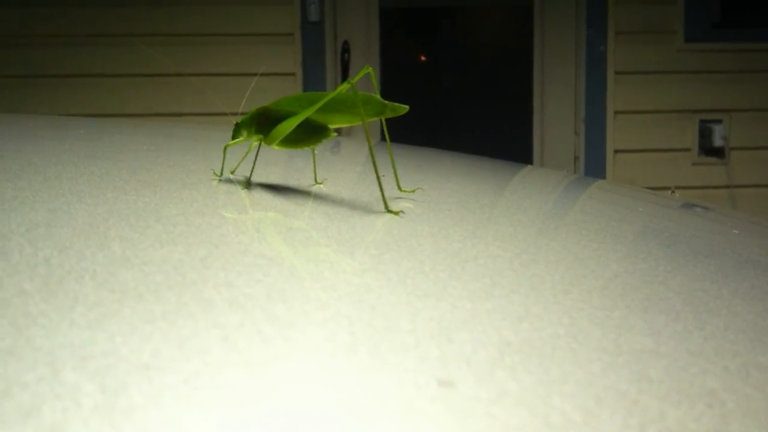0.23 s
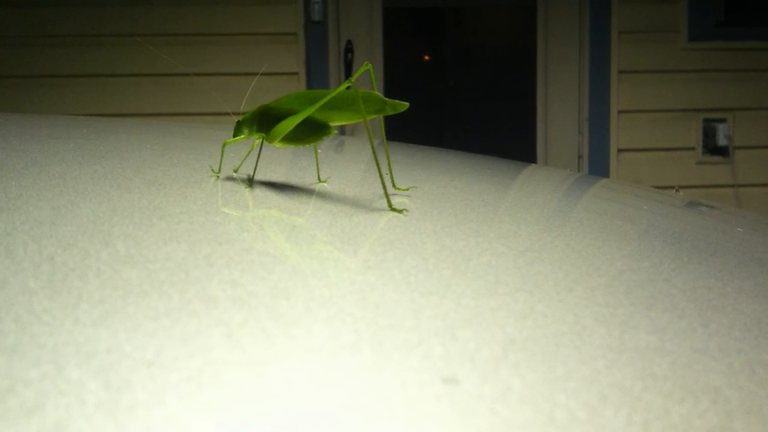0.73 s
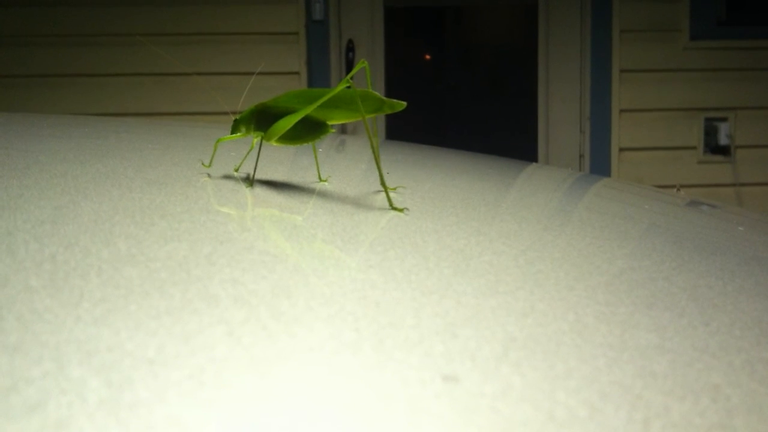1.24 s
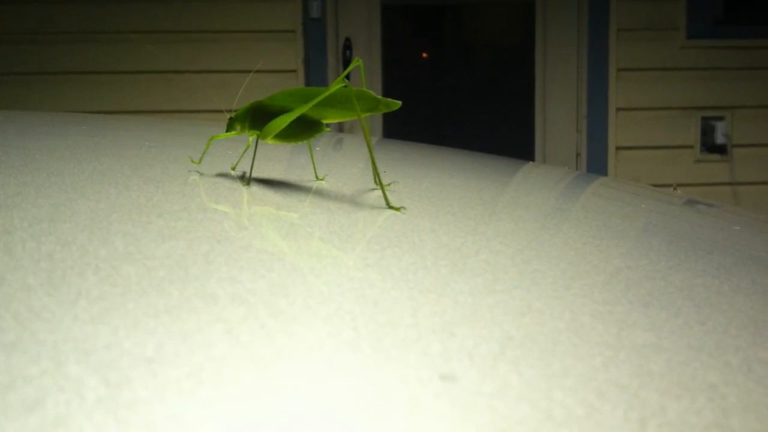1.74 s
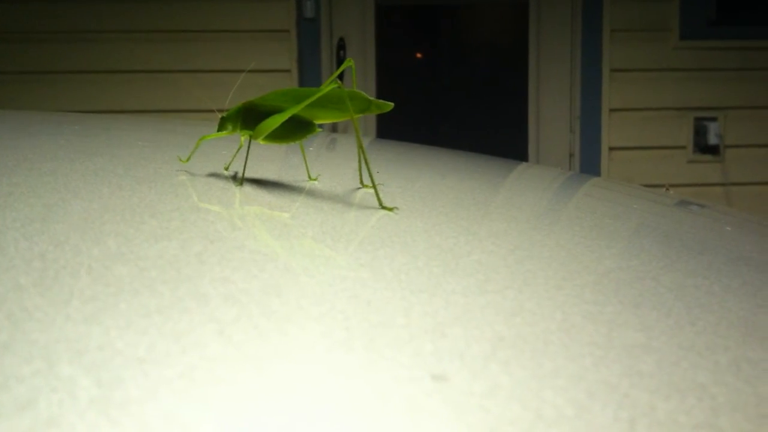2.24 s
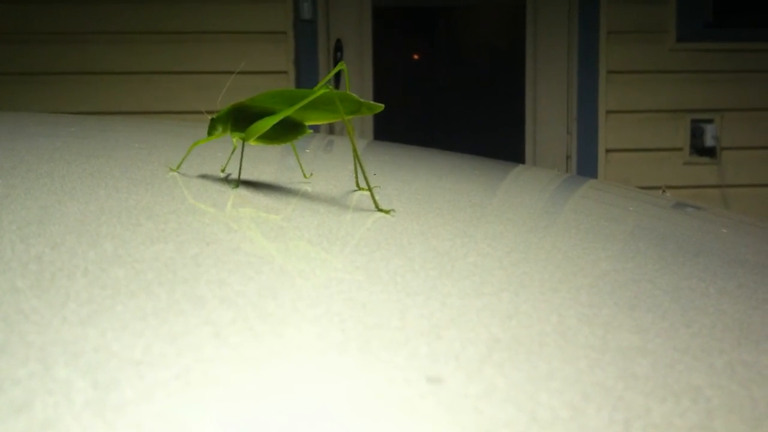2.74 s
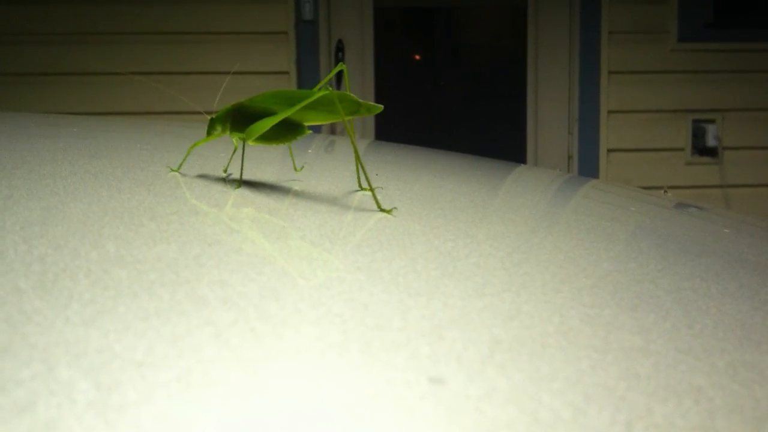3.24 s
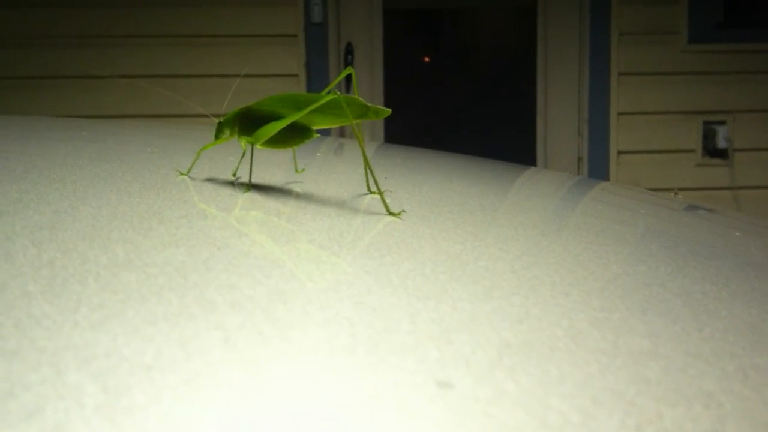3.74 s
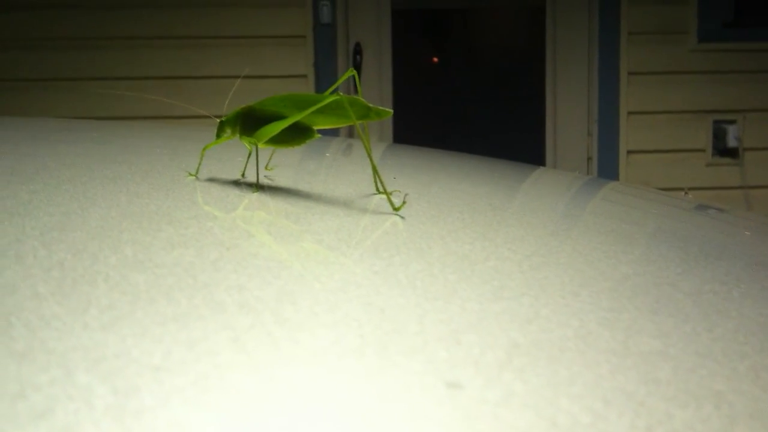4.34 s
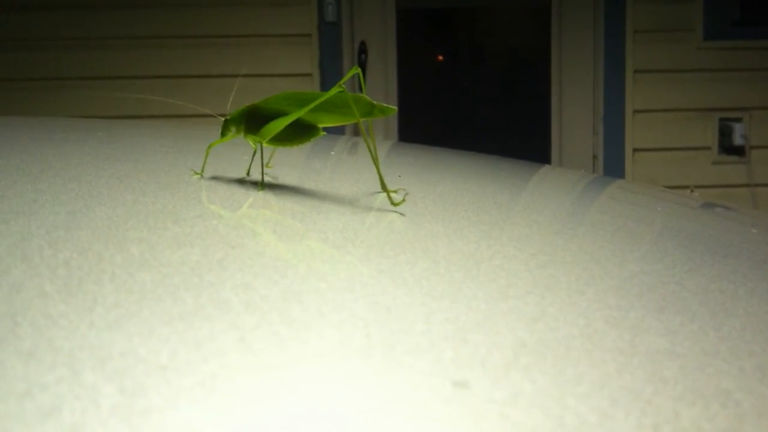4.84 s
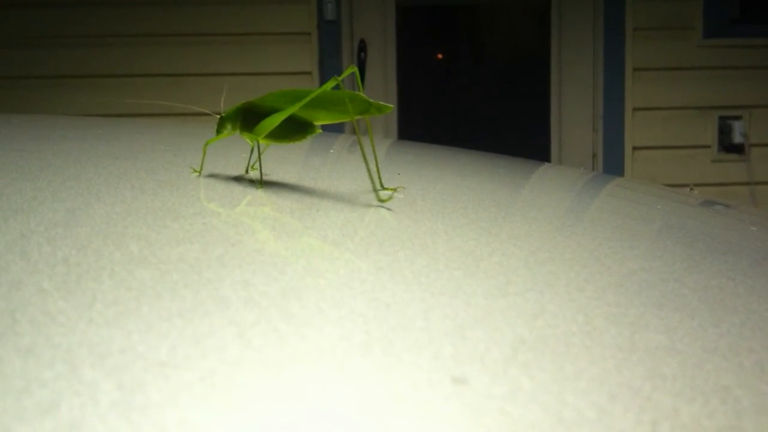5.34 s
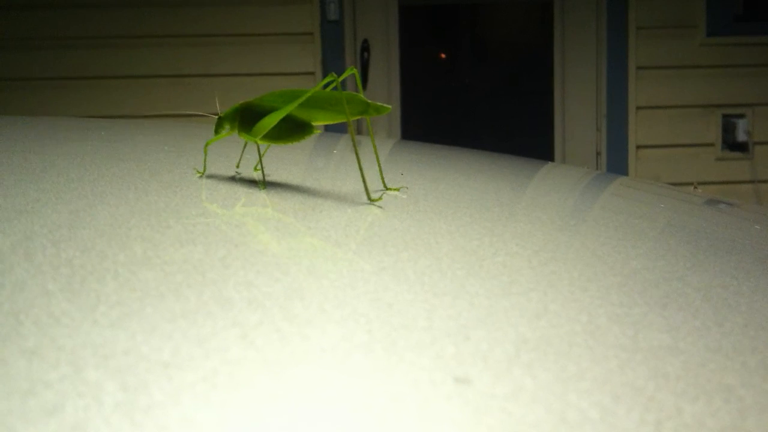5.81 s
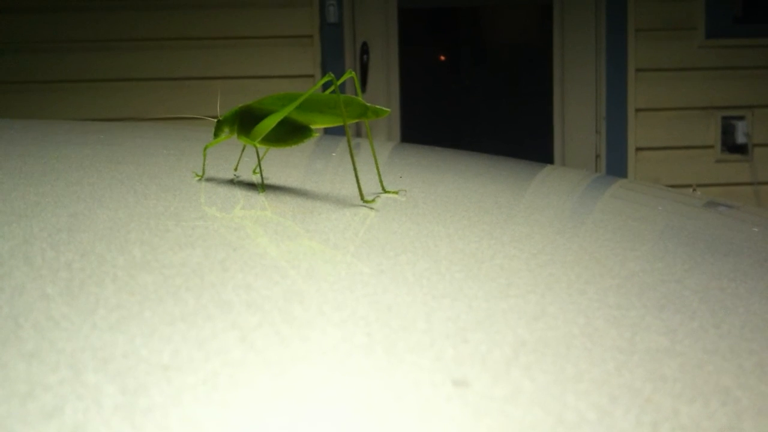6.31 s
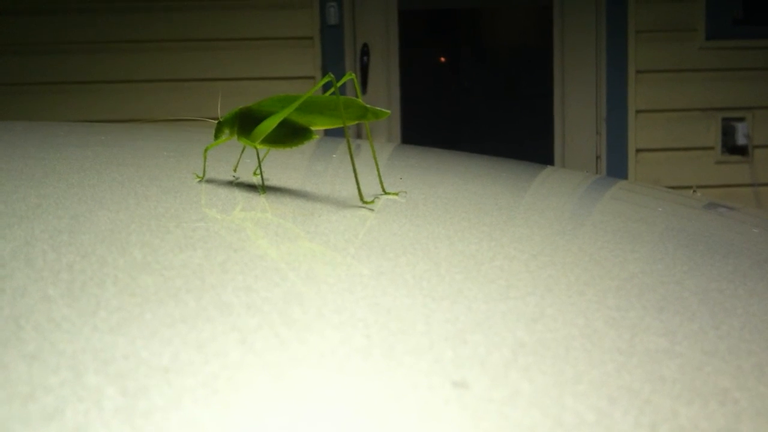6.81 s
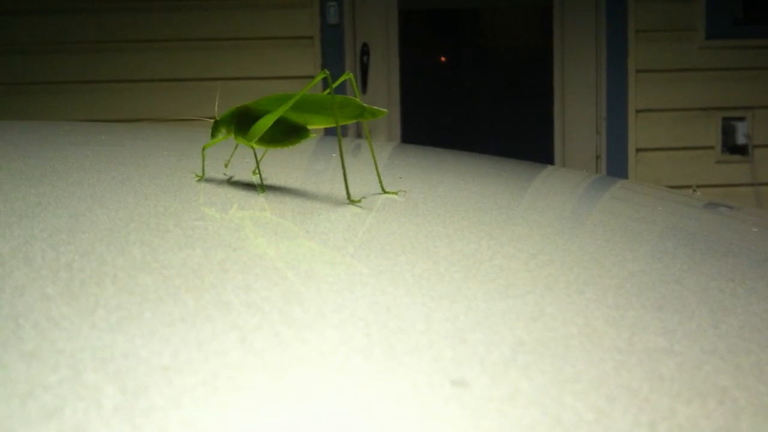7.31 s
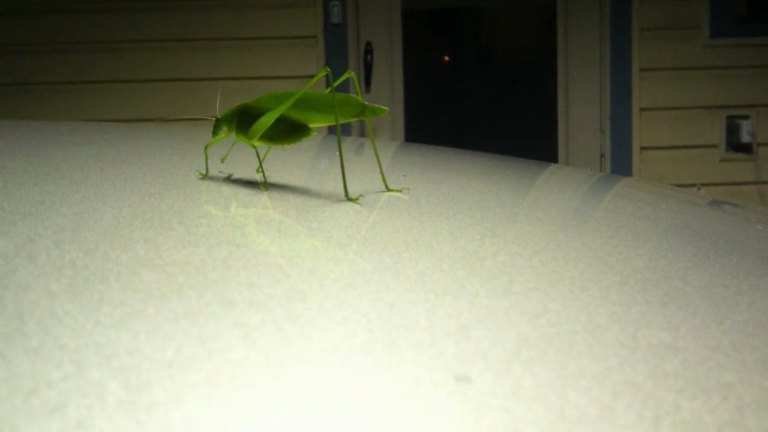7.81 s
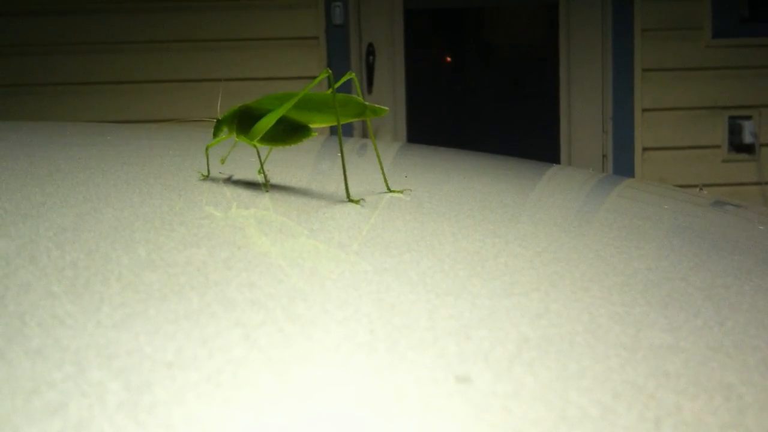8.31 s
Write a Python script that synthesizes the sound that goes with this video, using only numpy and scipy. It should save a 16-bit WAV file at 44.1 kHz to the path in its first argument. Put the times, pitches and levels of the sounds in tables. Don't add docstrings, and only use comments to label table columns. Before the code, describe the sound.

A continuous high cricket band shimmers over low night air while katydids overlap in raspy, pulsing phrases about a second apart, some close and dry, some lower and almost whistled, many farther away. Short gaps leave mainly the trill. A cricket zips now and then, swelling and stopping, and sparse tiny clicks sound close to the microphone. Distant traffic swells barely near five seconds. Mono, open yard with slight short echoes from walls and trees.

```python
import sys
import numpy as np
from scipy import signal
from scipy.fft import rfft, irfft, next_fast_len
from scipy.io import wavfile
from scipy.ndimage import uniform_filter1d

SR = 44100
rng = np.random.default_rng(int(sys.argv[2]) if len(sys.argv) > 2 else 0)


def digitize_waveform(pressure):
    field = np.atleast_2d(pressure).T
    bounded = np.clip(field, -1, 1)
    quanta = np.round(bounded * 32767).astype(np.int16)
    wavfile.write(sys.argv[1], SR, quanta)


def ratio_of_db(decibels):
    return 10 ** (np.asarray(decibels, float) / 20)


N = 377496

# first_stroke_s, last_stroke_s, level_db
NEAR_PHRASES = [
    (0.051, 0.051, -51.5),
    (1.119, 1.305, -53),
    (2.212, 2.401, -53),
    (3.27, 3.468, -53),
    (4.335, 4.59, -54.5),
    (5.483, 5.761, -52.5),
    (7.165, 7.447, -52),
]
# first_stroke_s, last_stroke_s, level_db
NEIGHBOUR_PHRASES = [(0.266, 0.266, -55.5), (0.43, 0.43, -55), (1.422, 1.497, -58), (2.147, 2.147, -60),
                     (2.578, 2.578, -58), (5.349, 5.349, -56), (6.421, 6.421, -62), (6.594, 6.594, -58),
                     (7.105, 7.105, -60)]
# first_stroke_s, last_stroke_s, first_level_db, last_level_db, pitch_hz
LOW_PHRASES = [(0.16, 0.16, -65, -65, 2040), (0.247, 0.419, -55.5, -55, 2100),
               (1.13, 1.307, -64, -60, 2010), (1.409, 1.494, -56, -55.5, 2164),
               (1.673, 1.673, -63, -75, 2050), (2.0, 2.0, -64.5, -64, 2010), (2.334, 2.334, -61, -61, 2090),
               (2.451, 2.54, -52.5, -61, 2160), (2.954, 3.129, -61, -61.5, 2070),
               (3.21, 3.405, -61, -56, 2133), (4.047, 4.2, -64, -59.5, 2044), (4.273, 4.47, -58, -58, 2140),
               (5.33, 5.522, -57.5, -56, 2110), (5.646, 5.646, -66, -64, 1980),
               (6.381, 6.381, -65, -62, 2180), (6.483, 6.665, -56, -58.5, 2165),
               (6.756, 6.833, -66, -63, 2050), (7.187, 7.379, -56.5, -57, 2110),
               (8.267, 8.511, -62, -62, 2070)]
# start_s, end_s, level_db, body_mode_level_db
CROWD_PHRASES = [(0.15, 0.25, -59.5, 1), (0.27, 0.5, -55, -1), (0.72, 1.0, -62.5, 1.5),
                 (1.05, 1.25, -63, 0), (1.28, 1.55, -56, -0.5), (1.6, 1.7, -60.5, -0.5),
                 (1.8, 2.1, -63.5, 0), (2.3, 2.63, -55.5, -0.5), (2.93, 3.17, -59.5, -1.5),
                 (3.2, 3.46, -55.5, 1), (3.95, 4.22, -59, -1), (4.26, 4.55, -55, 0), (4.58, 4.72, -61, 2),
                 (4.78, 4.92, -62.5, 2.5), (5.2, 5.33, -60.5, 1), (5.36, 5.6, -54.5, -0.5),
                 (5.64, 5.88, -59.5, -1.5), (6.37, 6.62, -56, 0), (6.65, 6.88, -61, -0.5),
                 (7.18, 7.47, -57, -0.5), (7.58, 7.82, -62, 0), (7.9, 8.2, -64.5, -0.5),
                 (8.25, 8.52, -59.5, 0.5)]
# centre_hz, width_hz, level_db
UPPER_MODES = [(3830, 470, -13), (4315, 1290, 12.5), (4870, 1550, 9)]
BODY_MODES = [(2050, 310, 0), (2680, 780, 1), (2946, 590, 4), (3260, 160, -6)]
BRIGHT_MODES = [(7900, 4200, -5), (11600, 2700, 9), (13000, 1700, 4), (14600, 2300, 3)]
# farthest_murmur_db, phrase_gain_db
CROWD_BALANCE = [
    (-64.5, 0),
    (-62, -1.5),
    (-88, -29.5),
]
# start_s, end_s, full_level_db
ZIPS = [
    (1.97, 2.14, -69),
    (2.716, 2.85, -73),
    (3.143, 3.51, -57.5),
    (5.764, 5.89, -69),
    (6.74, 7.04, -57.5),
]
# time_s, level_db (the peak lies 9 dB higher)
TICK_TIMES = [(0.3146, -54), (0.6794, -73), (0.7694, -73), (0.9522, -69), (2.8274, -76), (3.0334, -73),
              (3.5494, -74), (3.6184, -71), (4.1134, -73), (6.0417, -74), (6.0985, -69), (7.5864, -74),
              (7.9494, -72)]
# frequency_hz, density_db_per_hz
AIR_SPECTRUM = [(30, -29), (60, -24.5), (105, -16.5), (150, 1.5), (230, -0.5), (500, -9.5), (1100, -16.5),
                (1700, -15.5), (3600, -20), (5600, -16.5), (7200, -27.5), (9000, -28), (10500, -51),
                (15500, -61)]
# time_s, level_db
TRAFFIC = [(0, -62.5), (2, -62.5), (4.2, -62.5), (4.7, -62), (5.1, -58.5), (5.5, -63), (7, -62),
           (8.56, -62)]
# centre_hz, width_hz, level_db
MOTOR_LINES = [(119.6, 4, -6), (239, 6, -2), (481, 20, -5), (649, 12, -19)]

STROKE_GAP_S = .09
STROKE_PEAK_S = .07


def near_katydid(phrases, wing_hz, upper_db):
    out, shape = np.zeros(N), stroke(.034, .021, 5000)
    sag = np.linspace(1.05, .97, len(shape))
    for first, last, level_db in phrases:
        for s, db, hz in phrase(first, last, level_db, level_db, wing_hz):
            clicks = teeth(len(shape), 1500, .4)
            lower = evened(resonate(clicks, hz * sag, 480))
            upper = evened(resonate(clicks, 1.41 * hz * sag, 600))
            add(out, s - STROKE_PEAK_S, ratio_of_db(db) * shape * (lower + ratio_of_db(upper_db) * upper))
    return out


def low_katydids():
    out, shape = np.zeros(N), stroke(.034, .018, 5000)
    for row in LOW_PHRASES:
        for s, db, hz in phrase(*row):
            clicks = teeth(len(shape), 1200, .3)
            whistle = evened(resonate(clicks, hz, 130))
            octave = evened(resonate(clicks, 2.05 * hz, 250))
            add(out, s - STROKE_PEAK_S, ratio_of_db(db) * shape * (whistle + ratio_of_db(-10) * octave))
    return out


def phrase(first, last, first_db, last_db, hz):
    count = round((last - first) / STROKE_GAP_S) + 1
    level_scatter, pitch_scatter = rng.standard_normal((count, 2)).T
    times = np.linspace(first, last, count)
    levels_db = np.linspace(first_db, last_db, count) + .7 * level_scatter
    return zip(times, levels_db, hz * (1 + .012 * pitch_scatter))


def stroke(rise_s, fall_s, size):
    t = np.arange(size) / SR - STROKE_PEAK_S
    return np.where(t < 0, np.exp(-(t / rise_s) ** 2), np.exp(-(t / fall_s) ** 2))


def teeth(n, per_s, uneven):
    jitter = uneven * rng.standard_normal(n) * np.sqrt(SR / per_s)
    turns = np.cumsum(per_s * (1 + jitter)) / SR
    strength = rng.choice([-1., 1.], n) * rng.uniform(.54, 1, n)
    crossings = np.diff(np.floor(np.maximum.accumulate(turns)), prepend=0).clip(0, 1)
    return crossings * strength


def resonate(x, hz, width, order=2):
    carrier = np.exp(2j * np.pi * np.cumsum(hz * np.ones(len(x))) / SR)
    decay = np.exp(-np.pi * width / SR)
    z = x / carrier
    for _ in range(order):
        z = signal.lfilter([1 - decay], [1, -decay], z)
    return 2 * (carrier * z).real


def evened(x):
    return x / np.sqrt(np.mean(x ** 2) + 1e-20)


def add(mix, s, sound):
    at = round(s * SR)
    part = mix[max(at, 0):at + len(sound)]
    part += sound[max(-at, 0):][:len(part)]


def yard(x, t60):
    at = np.arange(200, SR // 2, 20)
    taps = np.zeros(SR // 2 + 20)
    decay = ratio_of_db(-60 * at / SR / t60)
    taps[at + rng.integers(0, 20, len(at))] = rng.choice([-1., 1.], len(at)) * decay
    return signal.fftconvolve(x, taps / np.linalg.norm(taps))[:N]


def crowd():
    clicks, out = teeth(N, 2500, .5), np.zeros(N)
    for (murmur_db, gain_db), modes in zip(CROWD_BALANCE, (UPPER_MODES, BODY_MODES, BRIGHT_MODES)):
        total = sum(ratio_of_db(2 * db) for _, _, db in modes)
        for mode in modes:
            t, phrase_power = crowd_power(CROWD_PHRASES, modes is BODY_MODES)
            patchy_db = evened(uniform_filter1d(rng.standard_normal(len(t)), size=12))
            power = ratio_of_db(2 * murmur_db) + ratio_of_db(2 * gain_db) * phrase_power
            level = np.sqrt(power / total) * ratio_of_db(mode[2] + patchy_db)
            ring = wing(np.roll(clicks, rng.integers(N)), [mode])
            out += np.interp(np.arange(N) / SR, t, level) * ring
    return out


def crowd_power(rows, body):
    t = np.arange(N // 220 + 2) * 220 / SR
    power = np.zeros(len(t))
    for start, end, db, body_db in rows:
        early, late, phase = rng.standard_normal(3)
        start, end = start + .015 * early, end + .015 * late
        progress = np.clip((t - start) / max(end - start, .02), 0, 1)
        arch_db = 1.5 * (np.sin(np.pi * progress) - .5)
        pulse_db = 2.5 * np.cos(2 * np.pi * ((t - end) / STROKE_GAP_S + phase))
        echo_db = -147 * np.maximum(t - end, 0)
        rise = np.exp(-2 * (np.maximum(start - t, 0) / .032) ** 2)
        power += ratio_of_db(2 * (db + body * body_db + arch_db + pulse_db + echo_db)) * rise
    return t, power


def wing(x, modes):
    size = next_fast_len(len(x))
    f = np.fft.rfftfreq(size, 1 / SR)
    power = sum(ratio_of_db(2 * db) / width / (1 + (2 * (f - hz) / width) ** 2) ** 2 for hz, width, db in modes)
    return evened(irfft(rfft(x, size) * np.sqrt(power), size)[:len(x)])


def ground_crickets(count=12):
    t, out = np.arange(N) / SR, np.zeros(N)
    for place in np.linspace(-1, 1, count):
        pace, phase = rng.random(2)
        wander = np.interp(t, np.arange(200) / 20, rng.standard_normal(200))
        turns = np.cumsum((30 + 40 * pace) * (1 + .08 * wander)) / SR + phase
        fall_hz = 120 * (.5 - turns % 1)
        hz = 6220 + 330 * place + fall_hz + 40 * wander
        pulse = np.sin(np.pi * np.minimum(turns % 1 / .82, 1))
        out += ratio_of_db(-5 * place ** 2) * pulse * np.sin(2 * np.pi * np.cumsum(hz) / SR)
    far = wing(rng.standard_normal(N), [(6120, 340, -.98), (6297, 160, -.98)])
    band = evened(out) + 1.19 * far
    steady = evened(band / np.sqrt(uniform_filter1d(band ** 2, size=SR // 12)))
    throb = np.cos(2 * np.pi * (t - .332) / .365)
    flicker = np.interp(t, np.arange(300) / 30, rng.standard_normal(300))
    return ratio_of_db(-52.5 + 1.5 * throb + .8 * flicker) * steady


def zipper():
    out = np.zeros(N)
    for start, end, full_db in ZIPS:
        t = np.arange(round((end - start + .14) * SR)) / SR
        db = np.minimum(-77 + 93 * t, full_db)
        db = db - 175 * np.maximum(t - (end - start), 0)
        db = uniform_filter1d(db, size=round(.07 * SR))
        puffs = (1 + .29 * np.cos(2 * np.pi * 111 * t)) * rng.standard_normal(len(t))
        pitch_hz = 6840 + 12 * (db - full_db)
        buzz = evened(resonate(puffs, pitch_hz, 800, order=3))
        add(out, start, ratio_of_db(db + 2) * buzz * signal.windows.tukey(len(t), .15))
    return out


def chirper():
    t = np.arange(N) / SR
    beats = (t - .129) / .2206
    strength = ratio_of_db(.66 * rng.standard_normal(50))[np.round(beats + 1).astype(int)]
    gate = np.clip(.5 + np.cos(2 * np.pi * beats), 0, 1)
    pulses = 1 + .5 * np.cos(2 * np.pi * 94 * t)
    ring = wing(rng.standard_normal(N), [(8480, 200, 0), (8400, 800, -1)])
    return ratio_of_db(-80) * strength * gate * pulses * ring


def ticks():
    out = np.zeros(N)
    for s, db in TICK_TIMES:
        add(out, s + .001, ratio_of_db(db + 9) * np.array([-.3, -.2, 1, -.5]))
    return out


def air():
    frames, hz = N // 512 + 5, np.fft.rfftfreq(2048, 1 / SR)
    real, imag, patches = rng.standard_normal((frames, 1025, 3)).T
    patches = evened(uniform_filter1d(uniform_filter1d(patches, 20, 0), 7, 1))
    f, db = np.transpose(AIR_SPECTRUM)
    s, swell_db = np.transpose(TRAFFIC)
    swell_db = np.interp(np.arange(frames) * 512 / SR, s, swell_db - swell_db.mean())
    low_part = .91 * np.exp(-np.log((hz + 1) / 400) ** 2)
    field_db = np.interp(np.log(hz + 1), np.log(f), db)[:, None] + .53 * patches
    field_db = field_db + np.outer(low_part, swell_db)
    noise = signal.istft((real + 1j * imag) * ratio_of_db(field_db), nperseg=2048, noverlap=1536)[1][:N]
    return ratio_of_db(-60.5) * evened(noise)


def hum():
    return ratio_of_db(-72.5) * wing(rng.standard_normal(N), MOTOR_LINES)


def scene():
    callers = near_katydid(NEAR_PHRASES, wing_hz=2963, upper_db=-2)
    callers = callers + near_katydid(NEIGHBOUR_PHRASES, wing_hz=2920, upper_db=-1)
    callers = callers + low_katydids()
    callers = callers + ratio_of_db(-7) * yard(callers, t60=.25)
    insects = callers + crowd() + ground_crickets() + zipper() + chirper()
    return (insects + ticks() + air() + hum())[None]


def roll_off(x):
    return signal.sosfilt(signal.butter(12, 15760, fs=SR, output="sos"), x)


def record(dry):
    return roll_off(dry)


dry = scene()
out = record(dry)
digitize_waveform(out)
```